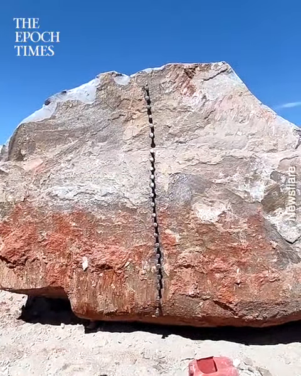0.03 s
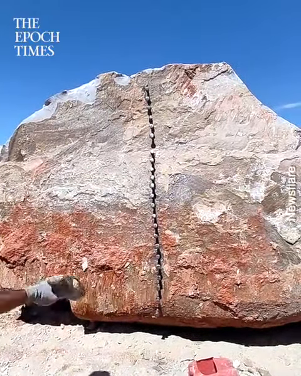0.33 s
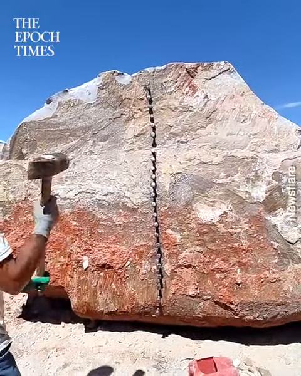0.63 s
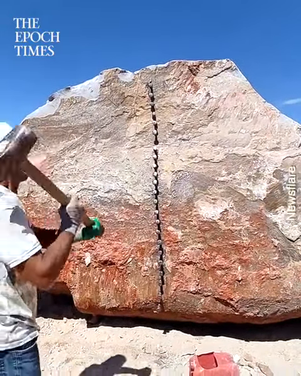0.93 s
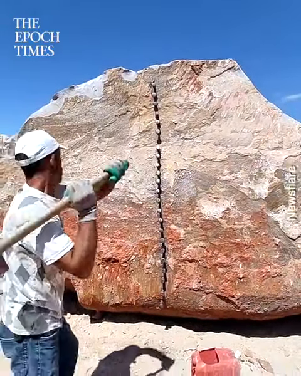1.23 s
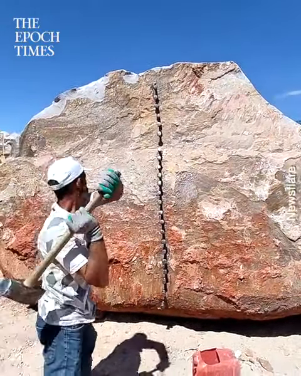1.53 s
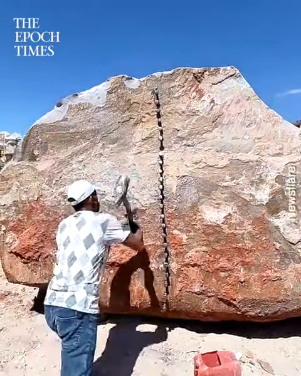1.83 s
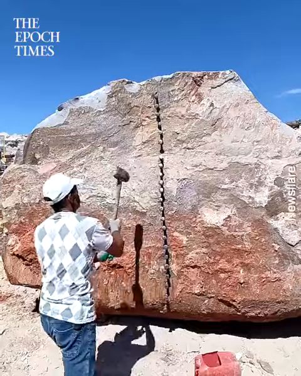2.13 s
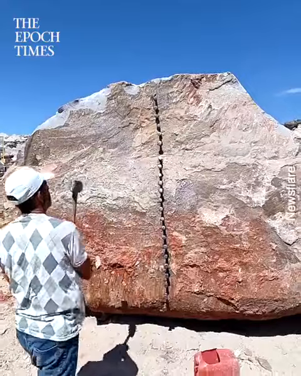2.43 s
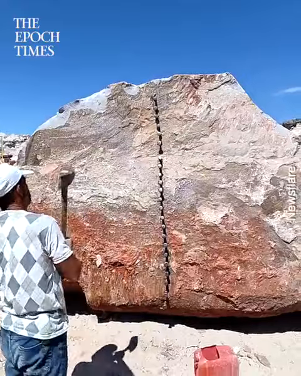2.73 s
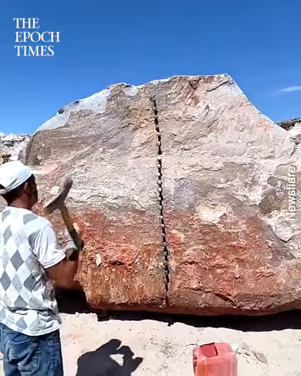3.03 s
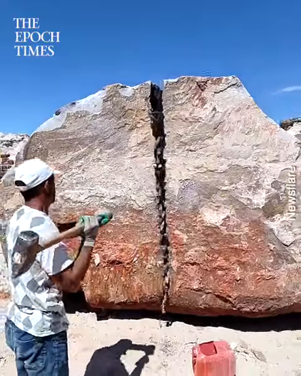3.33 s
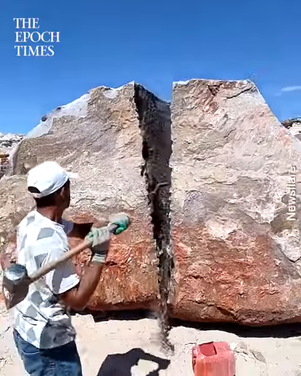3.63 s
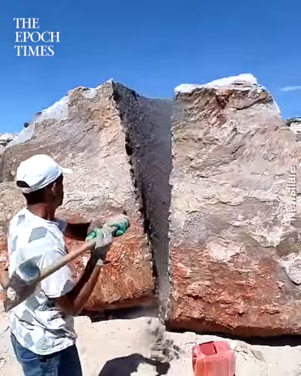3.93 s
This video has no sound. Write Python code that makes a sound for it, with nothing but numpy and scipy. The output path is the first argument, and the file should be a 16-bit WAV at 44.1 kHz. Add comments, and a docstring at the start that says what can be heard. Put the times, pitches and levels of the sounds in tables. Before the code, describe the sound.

One loud sledgehammer blow rings on steel wedges in a boulder at about 2.1 seconds, after faint outdoor wind, soft scuffs, a stamp and a quick swish. From 2.3 seconds the stone ticks and snaps, mostly on the right. At about 3.3 seconds it splits with a hollow rumble, and rubble pours while loose wedges jangle until 4 seconds. A light gust brushes the microphone near the end.

```python
"""One sledgehammer blow on a row of steel wedges in a boulder, heard in an open quarry.
The worker steps up and swings; wedge and rock ring, and the stone ticks and snaps as the crack runs,
mostly right of the microphone. Then it bursts apart: rubble pours down the gap and the freed wedges
jangle against each other. Light wind plays on the microphone, and a limiter ducks the blow."""
import sys
import numpy as np
from scipy import signal
from scipy.fft import rfft, irfft
from scipy.io import wavfile
from scipy.ndimage import uniform_filter1d, minimum_filter1d

SR = 44100
rng = np.random.default_rng(int(sys.argv[2]) if len(sys.argv) > 2 else 0)


def unload_audio(sound):
    """Save the sound as a 16-bit wav file, at the path given as the first command line argument."""
    columns = np.transpose(np.atleast_2d(sound))
    # keep every value between -1 and 1, then stretch to whole-number steps
    steps = np.round(np.clip(columns, -1, 1) * 32767)
    wavfile.write(sys.argv[1], SR, steps.astype(np.int16))


N = 176400
T = np.arange(N) / SR
FREQ = np.maximum(np.fft.rfftfreq(N, 1 / SR), 1)
FLUTTER_PER_S = 70

# Five bands of rock, boot and cloth noise. Each row: low and high edge in Hz, share of the pan (0-1).
BANDS = [(93, 187, 0.04), (211, 840, 0.05), (1010, 3220, 0.12), (3040, 6050, 0.68), (7570, 9430, 0.88)]


def amp(db):
    """Decibels to gain."""
    return 10 ** (np.asarray(db) / 20)


def pan(db):
    """Left and right gains for a level difference; positive is left of the microphone."""
    return amp(np.array([[db], [-db]]) / 2)


def unit(x):
    """Scale to rms 1."""
    return x / np.sqrt(np.mean(x ** 2))


def walk(rate):
    """Smooth random wandering, `rate` turns a second, spread near 1."""
    return np.interp(T * rate, np.arange(N), rng.standard_normal(N))


def burst(start, rise, t60):
    """Quick rise, then exponential decay; times in seconds."""
    age = np.maximum(T - start, 0)
    decay = np.exp(-np.minimum(np.log(1000) * np.maximum(age - rise, 0) / t60, 20))
    return np.minimum(age / rise, 1) * decay


def swell(peak_s, width_s):
    """A bell-shaped rise and fall."""
    return np.exp(-np.minimum(((T - peak_s) / width_s) ** 2, 20))


def tone(peak_s, hz, width_s, db):
    """A short swelling note."""
    return amp(db) * swell(peak_s, width_s) * np.sin(2 * np.pi * hz * (peak_s - T))


def colour(points):
    """Frequency response through (Hz, dB) points."""
    hz, db = np.array(points, float).T
    return amp(np.interp(np.log(FREQ), np.log(hz), db))


def noise(response, grain_db=0, grain_rate=900):
    """Coloured stereo noise at rms 1, optionally grainy; the bass is alike in both channels."""
    alike_hz, treble_likeness = 780, 0.054
    grain = amp(grain_db * np.clip(walk(grain_rate), -2, 2))
    mid, side = rfft(rng.standard_normal((2, N)) * grain)
    likeness = treble_likeness + (.95 - treble_likeness) / (1 + (FREQ / alike_hz) ** 2)
    mid, side = mid * np.sqrt(1 + likeness), side * np.sqrt(1 - likeness)
    return unit(irfft(np.array([mid + side, mid - side]) * response, N))


def ripple(depth_db=4, spacing_hz=130):
    """The uneven response of stone with many close resonances."""
    return amp(depth_db * np.interp(FREQ / spacing_hz, np.arange(N), rng.standard_normal(N)))


def band_noises(grain_db, order=4.63):
    """One noise for each band, coloured by the stone."""
    skirts = [(1 + (low / FREQ) ** (2 * order)) * (1 + (FREQ / high) ** (4 * order))
              for low, high, _ in BANDS]
    return [noise(ripple() / np.sqrt(skirt), grain_db) for skirt in skirts]


def air():
    """Open-air hiss and wind fluttering on the microphone, with one late buffet from the right."""
    # The quarry's steady air. Each row: frequency in Hz, relative level in dB.
    spectrum = [(24, -18), (40, -9.5), (712, -20), (1240, -23.5), (2510, -23), (2970, -30), (3690, -25),
                (13000, -24)]
    hiss = noise(colour(spectrum)) * amp(-57 + 1.8 * walk(6.84)) * pan(-0.92)
    lowpass = signal.butter(2, 55, fs=SR, output="sos")
    wind = unit(signal.sosfilt(lowpass, rng.standard_normal((2, N))))
    breeze = amp(-56 + 2 * walk(4.42))
    buffet = amp(-35.5) * burst(3.68, rise=0.13, t60=0.92) * pan(-7)
    return hiss + wind * (breeze + buffet)


def worker():
    """Scuffs, steps, the stamp of the leading foot and the hollow rush of the swing."""
    # Boots and clothes brushing. Each row: peak and half width in seconds, level in dB in each band.
    scuffs = [(0.173, 0.048, -67, -59, -61, -66, -58.5), (0.815, 0.033, -58, -49, -53, -60, -50),
              (0.891, 0.069, -65, -61.5, -62, -58, -50), (1.18, 0.072, -79, -65.5, -64, -64, -58)]
    # The rush of the swing, one row laid out like a scuff.
    swing = (2.109, .016, -42, -37, -37, -35, -33)
    # Footfalls and dull knocks. Each row: start and t60 in seconds, dB in the lowest two or three bands.
    steps = [(1.015, 0.067, -55, -44.5, -78), (1.517, 0.059, -57, -57, -55.5), (1.535, 0.35, -46, -52),
             (1.661, 0.043, -70, -53, -58.5), (1.805, 0.07, -73, -61, -53),
             (1.921, 0.41, -33.5, -40.5, -57), (2.815, 0.16, -48, -46, -49)]
    # Hollow notes in the swing. Each row: peak in seconds, pitch in Hz, half width in seconds, dB.
    swing_notes = [(2.088, 315, .014, -33), (2.1, 205, .02, -29), (2.107, 620, .011, -28)]
    out = 0
    for k, band in enumerate(band_noises(grain_db=5)):
        brush = sum(amp(dbs[k]) * swell(peak, width) for peak, width, *dbs in scuffs + [swing])
        tread = sum(amp(dbs[k]) * burst(start, 0.0037, t60) for start, t60, *dbs in steps if k < len(dbs))
        out += band * (brush + tread) * pan(-6.5 * BANDS[k][2])
    stamp = tone(peak_s=1.924, hz=110, width_s=.011, db=-19.5)
    return out + stamp + sum(tone(*note) for note in swing_notes)


def far_chirp(start_s=1.11, length_s=.075, end_hz=740, top_hz=970):
    """One faint chirp far from the microphone, rising and falling."""
    arch = np.sin(np.pi * np.clip((T - start_s) / length_s, 0, 1))
    hz = (end_hz + (top_hz - end_hz) * arch) * (1 + 0.036 * walk(330))
    return amp(-54) * np.sqrt(np.abs(arch)) * np.sin(2 * np.pi * np.cumsum(hz) / SR)


def cracks():
    """Each snap is a tight cluster of tiny fractures with a short, dull echo off the quarry."""
    # One faint tick before the blow, then the crack running. Each row: start and t60 in seconds,
    # level in dB in each band, pan in dB (each band takes its share).
    snaps = [(1.566, 0.011, -82, -70, -76, -52, -46.5, -12.5),
             (2.343, 0.027, -39, -42.5, -40.5, -41, -32.5, -10),
             (2.476, 0.015, -67, -48, -47.5, -49, -21, -10.5),
             (2.584, 0.013, -83, -61, -53, -45, -40.5, -16), (2.611, 0.035, -71, -66, -28, -27.5, -27, -13),
             (2.617, .028, -76, -66, -33, -26, -32.5, -12.5),
             (2.7616, 0.026, -68, -69, -49.5, -37, -28.5, -16.5),
             (2.795, 0.048, -64, -54.5, -56, -54, -41.5, -12),
             (2.9867, 0.041, -40, -37, -33, -33, -28, -12.5), (3.156, 0.015, -73, -66, -54, -55, -37.5, -6),
             (3.189, 0.017, -51, -35.5, -30.5, -29.5, -27, -15.5),
             (3.2661, 0.019, -66, -65, -46, -35, -31, -9),
             (3.325, 0.15, -38, -30.5, -25.5, -51, -34.5, -16), (3.392, 0.1, -59, -45, -39, -27, -22, -12),
             (3.484, 0.045, -30, -21, -31, -26, -27, -7), (3.6, 0.072, -21.5, -35, -30, -53, -38, 14),
             (3.812, 0.12, -48.5, -48, -50, -28, -14, 2), (3.892, 0.048, -61, -58, -52, -20.5, -15.5, 1)]
    # The quarry's answer, band by band. Each row: level in dB against the snap, t60 in seconds.
    quarry = [(-7, 0.54), (-12.5, 0.46), (-14, 0.12), (-36.5, 0.6), (-32, 1)]
    out = 0
    for k, band in enumerate(band_noises(grain_db=4.5)):
        echo_db, echo_t60 = quarry[k]
        power = 0
        for start, t60, *dbs, pan_db in snaps:
            direct = burst(start, 0.0028, t60)
            echo = amp(echo_db) * burst(start, 0.014, echo_t60)
            gain = amp(dbs[k]) * pan(pan_db * BANDS[k][2])
            power += gain ** 2 * (direct ** 2 + echo ** 2)
        out += band * np.sqrt(power)
    return out


def hammer():
    """Steel meets steel twice in quick succession; wedge and boulder ring on with a flutter."""
    # Contact and rebound. Each row: start and t60 in seconds, level in dB in each band.
    blows = [(2.1277, .024, -13, -3, 1, 5, 15), (2.1328, .05, -17, -7, -2, 2, 13)]
    # Modes of wedge and boulder. Each row: pitch in Hz, level in dB, t60 in seconds, pan in dB.
    modes = [(156, -24, .7, 0), (248, -18, .62, 0), (296, -20, .36, 0), (714, -17, .14, 0),
             (765, -2, .06, 0), (6630, -9, .29, -3), (7974, -2, .39, -9), (10420, 8, .24, -3),
             (10490, 5, .18, 3)]
    contact_s, _, *contact_dbs = blows[0]
    echo = amp(-33) * burst(contact_s, rise=0.0028, t60=0.43)
    out = 0
    for k, band in enumerate(band_noises(grain_db=2.5)):
        impact = sum(amp(dbs[k]) * burst(start, 0.00025, t60) for start, t60, *dbs in blows)
        out += band * (impact + amp(contact_dbs[k]) * echo)
    for hz, db, t60, pan_db in modes:
        lag_cycles = np.array([[0], [hz / 30000]])  # the right channel hears it slightly later
        ring = amp(db + 2.6 * walk(FLUTTER_PER_S)) * burst(contact_s, 0.0022, t60)
        out += ring * pan(pan_db) * np.sin(2 * np.pi * (hz * (T - contact_s) - lag_cycles))
    return out


def stones(count=1800, low_hz=670, high_hz=5940, t60=.006):
    """Fragments clack together, each with its own pitch, size and place."""
    out, age = np.zeros((2, N)), T[:SR // 100]
    decay = np.exp(-np.log(1000) * age / t60)
    for when, pitch, size, side, turn in rng.random((count, 5)):
        at = int(when * (N - len(age)))
        hz = low_hz * (high_hz / low_hz) ** pitch
        clack = np.sin(2 * np.pi * hz * age + np.array([[0], [turn * 2]])) * decay
        gain = amp(9 * min(-np.log(size), 2))  # many small, a few large
        out[:, at:at + len(age)] += clack * gain * pan(10 * (side - .5))
    return unit(out)


def parting():
    """The halves grind and roll apart with a hollow rumble, left of centre; grit pours down in spurts."""
    # The course of the split. Each row: time in seconds, gain of the rumble and of the grit in dB.
    course = [(3.2, -75, -55), (3.313, -62.5, -49), (3.328, -39, -41), (3.375, -38, -26),
              (3.438, -45.5, -34), (3.461, -29, -23.5), (3.495, -26.5, -23.5), (3.57, -25.5, -30),
              (3.707, -40, -31), (3.744, -52, -39), (3.889, -65, -30), (3.929, -55, -41), (4.0, -53, -25.5)]
    # Rolling rock. Each row: frequency in Hz, relative level in dB.
    rumble_spectrum = [(30, -9), (80, -18), (115, -2.5), (200, -2), (380, -4), (520, -13.5), (790, -6),
                       (1100, -20), (2300, -21), (5000, -49)]
    # Hollow notes of the halves. Each row: pitch and half width in Hz, dB against the rolling rock.
    slab_notes = [(231, 10, -4), (347, 16, -4)]
    # Crumbling grit. Each row: frequency in Hz, relative level in dB.
    grit_spectrum = [(200, -11), (800, -10.5), (2200, -4.5), (3100, -11), (4200, -3), (6200, -7),
                     (8500, -1), (9600, -14.5), (12500, -10)]
    times, rumble_db, grit_db = np.array(course).T
    rumble = noise(colour(rumble_spectrum), grain_db=5.5, grain_rate=250)
    for hz, width, db in slab_notes:
        rumble += amp(db) * noise(1 / (1 + ((FREQ - hz) / width) ** 2))
    grit = noise(colour(grit_spectrum) * np.sqrt(ripple())) + amp(-8) * stones()
    spurts_db = 3 * walk(FLUTTER_PER_S)
    rumble *= amp(np.interp(T, times, rumble_db, left=-120))
    grit *= amp(np.interp(T, times, grit_db, left=-120) + spurts_db)
    return rumble * pan(6.5) + grit


def wedges():
    """Freed wedges tumble: each clink favours the modes near its pitch; a light rattle stirs them all."""
    # Modes of the loose steel. Each row: pitch in Hz, relative level in dB, t60 in seconds, pan in dB.
    modes = [(6562, -17, .2, 0), (6845, -5, .16, -6), (6990, -1, .13, -2), (7232, -4, .16, -2),
             (7483, -6, .17, -7), (7597, 1, .2, -9), (7734, -5, .16, -5), (7919, -4, .2, -5),
             (8166, -7, .2, -10), (8337, -1, .22, -7), (10830, -13, .12, 6), (11105, -1, .18, 12),
             (11260, -5, .12, 6), (11929, -5, .2, 8), (12295, -8, .2, 6)]
    # The clearest collisions. Each row: start in seconds, level in dB, favoured pitch in Hz.
    clinks = [(3.425, -16, 8380), (3.46, -15, 8160), (3.482, -13, 7020), (3.519, -16, 7830),
              (3.578, -14, 8370), (3.634, -10, 8350), (3.652, -10, 7090), (3.686, -11, 8370),
              (3.742, -13, 11080), (3.757, -7, 7610), (3.8125, -12, 7400), (3.832, -5, 6950),
              (3.868, -11, 7660), (3.894, -12.5, 11200), (3.939, -21, 6550), (3.99, -14, 7110)]
    favour_width_hz, spill_db, waver_hz = 120, -15, 20
    rattle_per_s, rattle_db = 70, -27
    clink_s, clink_db, clink_hz = np.array(clinks).T
    rattle_s = np.arange(3.48, 3.94, 1 / rattle_per_s)
    rattle_s += rng.random(len(rattle_s)) / rattle_per_s
    at = np.minimum((np.r_[clink_s, rattle_s] * SR).astype(int), N - 1)
    out = 0
    for hz, mode_db, t60, pan_db in modes:
        favour = np.exp(-((hz - clink_hz) / favour_width_hz) ** 2) + amp(mode_db + spill_db)
        rattle = amp(rattle_db + mode_db) * rng.exponential(size=len(rattle_s))
        strength = np.r_[amp(clink_db) * favour, rattle]
        hits = np.zeros((2, N), complex)  # each hit has a random phase in each channel
        hits[:, at] = strength * np.exp(2j * np.pi * rng.random((len(at), 2)).T)
        decay = burst(0, rise=.004, t60=t60)[None, :SR // 5]
        ring = signal.oaconvolve(hits, decay, axes=1)[:, :N]
        phase = 2 * np.pi * np.cumsum(hz + waver_hz * walk(FLUTTER_PER_S)) / SR
        out += pan(pan_db) * (ring * np.exp(1j * phase)).real
    return out


def scene():
    """The quarry as it reaches the microphone."""
    background = air() + far_chirp()
    return background + worker() + hammer() + cracks() + parting() + wedges()


def record(dry):
    """A limiter ducks at each new peak over full scale, creeps back, then lets go; the top is cut."""
    block_s, hold_s, recover_s, creep_db_per_s, top_hz = .0015, .108, .005, 75, 12900
    block = int(block_s * SR)
    peaks = np.maximum.reduceat(np.abs(dry).max(axis=0), np.arange(0, N, block))
    gain, wait, gains = 1, 0, []
    for allowed in np.minimum(1, 1 / peaks):
        if allowed < gain:
            gain, wait = allowed, hold_s
        elif wait > 0:
            gain = min(allowed, gain * amp(creep_db_per_s * block_s))
            wait -= block_s
        else:
            gain += (allowed - gain) * block_s / recover_s
        gains.append(gain)
    look_ahead = minimum_filter1d(np.repeat(gains, block)[:N], block)
    ducked = dry * uniform_filter1d(look_ahead, block)
    return signal.sosfilt(signal.ellip(8, .2, 70, top_hz, fs=SR, output="sos"), ducked)


dry = scene()
out = record(dry)
unload_audio(out)
```